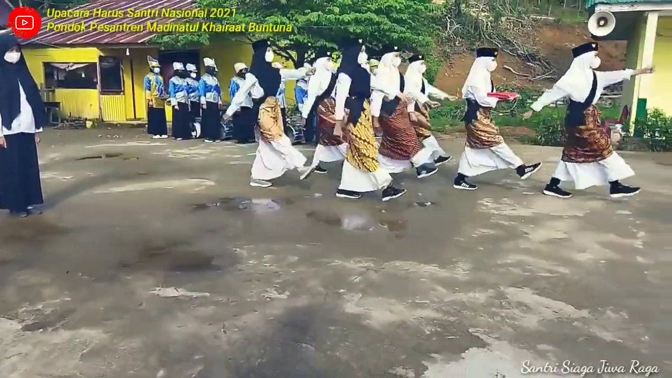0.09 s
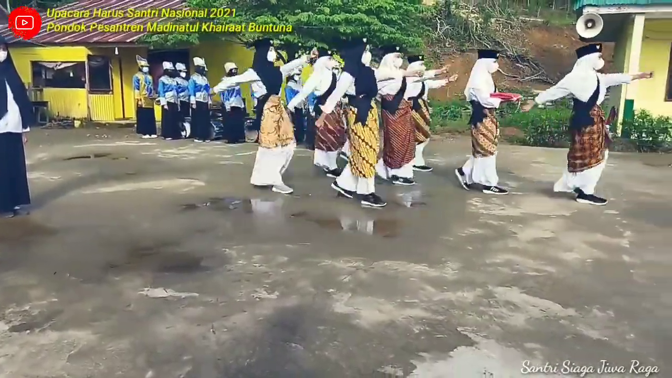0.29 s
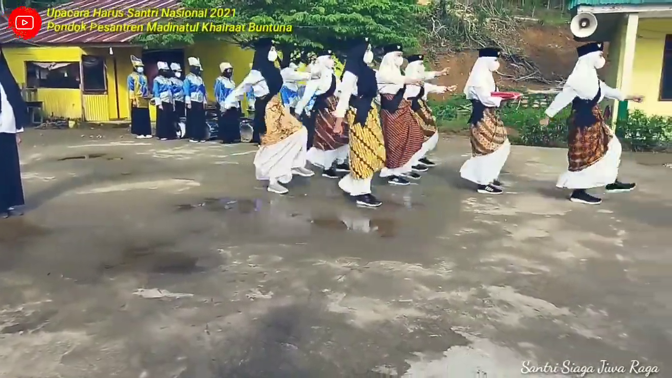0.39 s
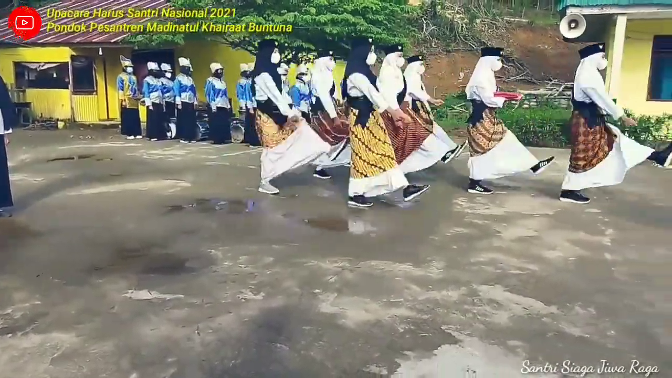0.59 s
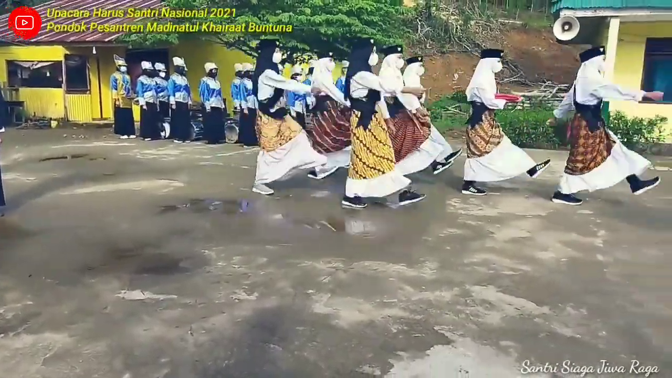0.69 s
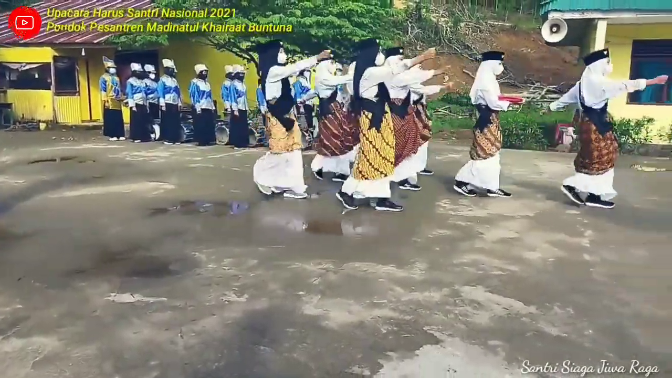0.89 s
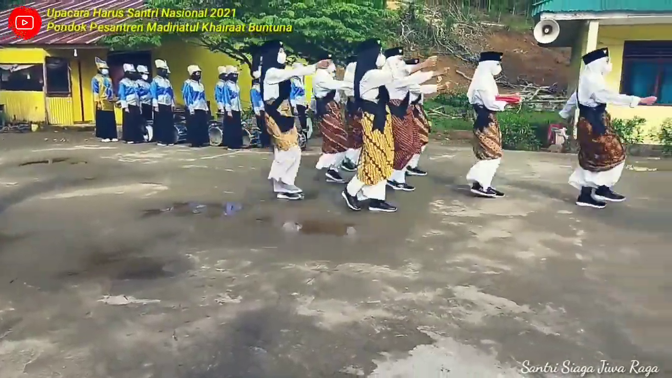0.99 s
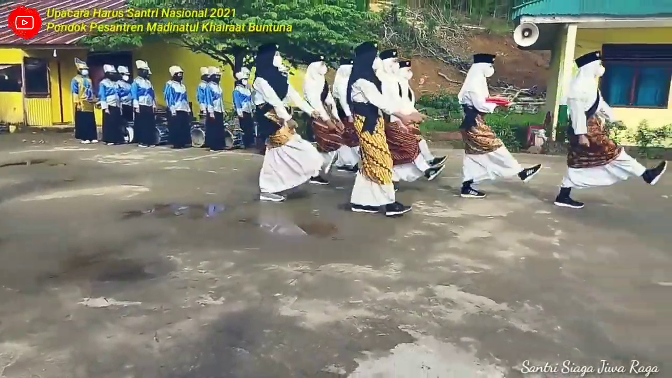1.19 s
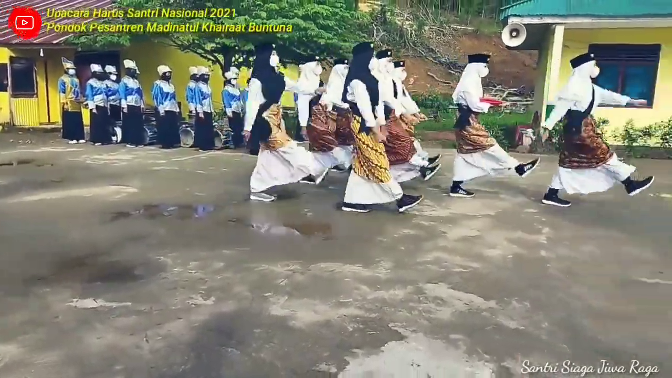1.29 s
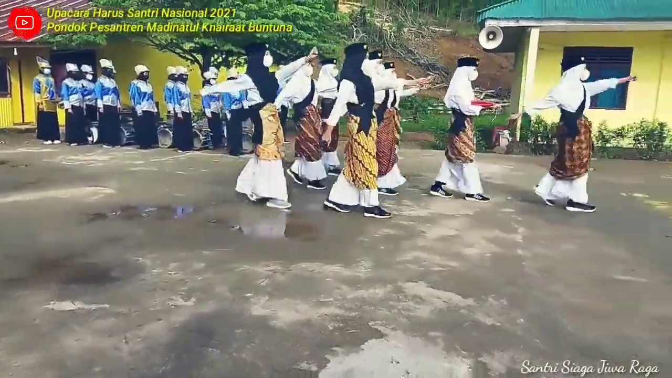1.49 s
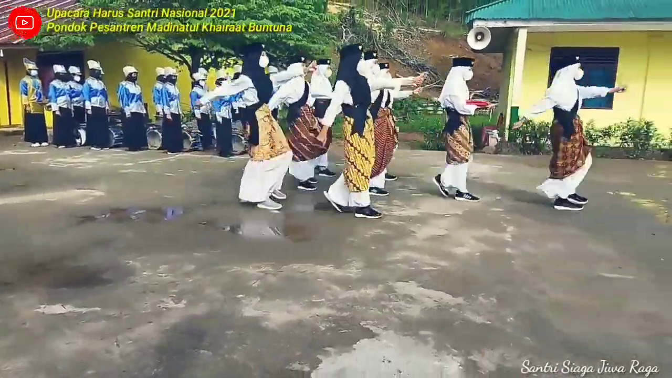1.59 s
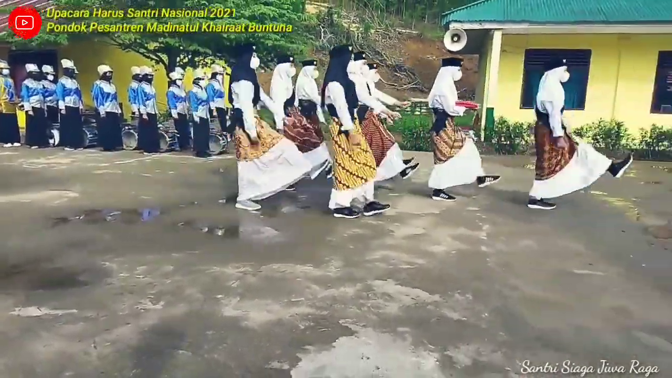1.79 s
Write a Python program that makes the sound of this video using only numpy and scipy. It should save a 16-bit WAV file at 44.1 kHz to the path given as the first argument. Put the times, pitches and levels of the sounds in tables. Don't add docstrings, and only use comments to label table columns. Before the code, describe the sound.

A group of marchers stamps three times on concrete, soles slapping in loose unison with gritty crunch and dull heel thumps; faint toe scuffs between, distant birds and light wind, heard from a few steps away.

```python
import sys
import numpy as np
from scipy import signal
from scipy.fft import rfft, irfft
from scipy.io import wavfile

SR = 44100
rng = np.random.default_rng(int(sys.argv[2]) if len(sys.argv) > 2 else 0)


def wrap_up_sound(samples):
    columns = np.atleast_2d(samples).T
    tamed = np.clip(columns, -1, 1)
    steps = np.round(tamed * 32767).astype(np.int16)
    wavfile.write(sys.argv[1], SR, steps)


def makeup_ratio(level_db):
    decades = np.asarray(level_db, float) / 20
    return 10 ** decades


N = 81585

# f/Hz, level/dB per Hz
WIND_SPECTRUM = [(20, -5.5), (45, -15.5), (115, -11.5), (200, -23.5), (400, -28.5), (800, -30.5),
                 (3000, -34.5), (5200, -40)]
# f/Hz, level/dB per Hz
HISS_SPECTRUM = [(4800, -37), (6300, -15), (7600, -1), (8600, 2.5), (10000, -2), (11200, -10),
                 (15500, -6.5)]
# t/s, slap level/dB, slap t60/s, grit level/dB, sole hollow f/Hz
STAMPS = [(.201, -45.5, 0.052, -43, 1500), (.2095, -26, 0.16, -31, 577), (.2205, -24.5, 0.061, -21, 1410),
          (.225, -26.5, 0.032, -38, 970), (.239, -31.5, 0.063, -38, 550), (.246, -30, .05, -30, 730),
          (.2645, -27, 0.064, -30.5, 2450), (.8215, -45.5, 0.071, -39, 865),
          (.828, -33.5, 0.029, -31, 2560), (.8335, -23, 0.083, -26.5, 1436),
          (.851, -27.5, 0.035, -27.5, 2620), (.860, -31.5, 0.14, -34, 2030), (.869, -35, 0.12, -30.5, 1090),
          (.885, -27.5, 0.052, -23, 2090), (.896, -32.5, 0.017, -31.5, 930), (1.452, -25, 0.057, -30, 697),
          (1.468, -21.5, 0.022, -22.5, 1030), (1.473, -23, .05, -42, 1400), (1.485, -22, 0.038, -46, 1020),
          (1.499, -39, 0.028, -28, 1210), (1.513, -38, 0.028, -29.5, 915), (1.532, -27.5, 0.072, -24, 2430),
          (1.539, -26.5, 0.043, -44, 930)]
# t/s, length/s, dull level/dB, grit level/dB
BLURS = [
    (0.207, .068, -31, -36.5),
    (0.851, 0.06, -32, -36),
    (1.449, 0.095, -32.5, -37),
]
# t/s, length/s, drag level/dB, dull level/dB
SCUFFS = [(.32, 0.084, -50, -58.5), (0.978, 0.022, -48.5, -49), (1.146, 0.032, -72, -54.5),
          (1.636, 0.049, -51, -75), (1.692, 0.0063, -48.5, -61), (1.761, 0.024, -39, -49.5),
          (1.778, 0.027, -44.5, -54.5), (1.804, 0.0096, -53, -60.5), (0.556, 0.011, -81, -57.5),
          (0.644, 0.009, -72, -68), (0.41, 0.061, -64, -61)]
# f/Hz, level/dB per Hz
SLAP_SPECTRUM = [(90, -26.5), (410, -8.5), (500, -0.5), (1050, -2.5), (2700, -3.5), (3600, -9.5),
                 (6000, -18), (12000, -32.5)]
# f/Hz, level/dB per Hz
GRIT_SPECTRUM = [(2000, 2), (3300, -17), (4700, -1), (6400, -11.5), (8500, 4), (10000, -2.5), (11800, -6.5),
                 (15300, 0.5)]
# f/Hz, level/dB per Hz
DRAG_SPECTRUM = [(1500, -22), (2600, -2), (3500, -11), (4800, -4), (6400, -14), (8800, 3), (11500, -7.5),
                 (15300, -7.5)]
# f/Hz, t60/s
YARD_T60 = [(150, 1), (700, 0.75), (2500, 0.58), (5000, 0.49), (12000, 0.41)]
# t/s, level/dB, f/Hz, t60/s
THUMPS = [(0.242, -32.5, 139.8, 0.15), (0.259, -23, 128, 0.033), (0.246, -39.5, 272, 0.13),
          (.449, -32.5, 132, 0.092), (0.449, -38.5, 294, 0.079), (.452, -45.5, 199, .12),
          (0.837, -42.5, 167.3, 0.11), (0.828, -38, 415, 0.068), (0.889, -42, 71, 0.126),
          (1.154, -48, 347, 0.057), (1.154, -51, 200, 0.056), (1.457, -35, 148.6, 0.067),
          (1.541, -61, 250, .08)]
# t/s, length/s, start f/Hz, end f/Hz
CHIRPS = [
    (.28, .03, 7550, 7400),
    (.305, .055, 7200, 5950),
    (.355, .075, 6000, 4500),
    (.668, .035, 4750, 4600),
    (.885, .055, 4850, 4750),
    (.62, .12, 810, 800),
    (1.29, .05, 620, 610),
]
CHIRP_LEVELS = [-51, -55, -61, -63.5, -54.5, -65, -59]
# t/s, length/s, start f/Hz, end f/Hz
CHURRS = [
    (.985, .06, 5150, 4700),
    (1.015, .065, 4500, 4000),
    (1.06, .06, 4700, 3900),
    (1.065, .055, 3700, 3200),
    (.712, .035, 4300, 3900),
]
CHURR_LEVELS = [-48.5, -47.5, -63, -53.5, -59.5]

WIND_DB, HISS_DB = -49.5, -59
HUM_HZ, HUM_WIDTH_HZ, HUM_DB = 63.1, 5, -62
SLAP_RISE_S, GRIT_RISE_S, GRIT_T60_S = 0.00097, 0.00067, 0.079
GRAINS_PER_S, GRAIN_SPREAD_DB = 12000, 3.5
SOLE_CYCLES, SOLE_DB, CRACK_DB = 15, -1.5, -2
BLUR_FADE_DB, DRAG_FADE_DB, NOTE_FADE_DB = -6.5, -1.5, -3.5
YARD_DB, YARD_GRIT_DB, YARD_BIRDS_DB, FIRST_WALL_S = -11.5, -13.5, -9.5, 0.006
CHIRP_WIDTH_HZ, CHURR_WIDTH_HZ = 35, 380
MIC_TOP_HZ = 15480


def rms_one(x):
    return x / np.sqrt(np.mean(x ** 2) + 1e-20)


def at_hz(points, hz):
    table = np.array(points)
    return np.interp(np.log(hz), np.log(table[:, 0]), table[:, 1])


def colour(x, spectrum):
    size = 8192
    hz = np.maximum(np.fft.rfftfreq(size, 1 / SR), 1)
    cepstrum = irfft(np.log(makeup_ratio(at_hz(spectrum, hz))))
    cepstrum[1:size // 2] *= 2
    cepstrum[size // 2 + 1:] = 0
    pulse = irfft(np.exp(rfft(cepstrum)))
    return signal.fftconvolve(x, pulse / np.sqrt(np.sum(pulse ** 2)))[:N]


def resonate(x, hz, width_hz):
    r = np.exp(-np.pi * width_hz / SR)
    top = np.array([1, 0, -1]) * (1 - r * r) / 2
    return signal.lfilter(top, [1, -2 * r * np.cos(2 * np.pi * hz / SR), r * r], x)


def time_since(s):
    return np.maximum(np.arange(N) / SR - s, 0)


def share_of(s, length):
    return np.clip((np.arange(N) / SR - s) / length, 0, 1)


def strike(s, db, rise_s, t60):
    t = time_since(s)
    return makeup_ratio(db) * (1 - np.exp(-t / rise_s)) * np.exp(-np.log(1000) * t / max(t60, 0.004))


def swell(s, length, db, fade_db=0):
    share = share_of(s, length)
    return makeup_ratio(db + fade_db * share) * np.sqrt(np.sin(np.pi * share).clip(0))


def power_sum(envelopes):
    return np.sqrt(np.sum(np.square(envelopes), axis=0))


def drift(rate):
    r = np.exp(-80 * np.pi * rate / SR)
    slow = signal.lfilter([1], [1, -2 * r, r * r], rng.standard_normal(N // 40 + 2002))
    slow = slow[2000:]
    return np.interp(np.arange(N) / 40, np.arange(len(slow)), rms_one(slow))


def air():
    white = rng.standard_normal((3, N))
    wind = colour(white[0], WIND_SPECTRUM + [(SR / 2, -70)]) * makeup_ratio(0.88 * drift(6))
    hiss = colour(white[1], HISS_SPECTRUM) * makeup_ratio(0.6 * drift(6))
    hum = rms_one(resonate(white[2], HUM_HZ, HUM_WIDTH_HZ))
    return makeup_ratio(WIND_DB) * wind + makeup_ratio(HISS_DB) * hiss + makeup_ratio(HUM_DB) * hum


def grains():
    sizes = makeup_ratio(GRAIN_SPREAD_DB * np.minimum(rng.exponential(1, N), 4)) * rng.choice([-1, 1], N)
    clicks = sizes * (rng.random(N) < GRAINS_PER_S / SR)
    return rms_one(clicks + 0.37 * rng.standard_normal(N))


def sole_slaps(slaps):
    blurs = [swell(s, d, db, BLUR_FADE_DB) for s, d, db, _ in BLURS]
    dull_scuffs = [swell(s, d, db) for s, d, _, db in SCUFFS]
    push = power_sum(slaps + dull_scuffs + blurs) * grains()
    for s, db, *_ in STAMPS:
        start = int(s * SR) + 30
        push[start:start + 12] -= makeup_ratio(db + CRACK_DB) * np.hanning(12)
    return colour(push, SLAP_SPECTRUM)


def sole_hollows(slaps):
    sand, out = grains(), 0
    for envelope, (*_, hz) in zip(slaps, STAMPS):
        width_hz = hz / SOLE_CYCLES * 2
        ring = resonate(envelope * sand + 1e-18, hz, width_hz)
        out = out + makeup_ratio(SOLE_DB) * ring * np.sqrt(SR / np.pi / width_hz)
    return out


def grit_and_scuffs():
    crushed = [strike(s, db, GRIT_RISE_S, GRIT_T60_S) for s, _, _, db, _ in STAMPS]
    blurs = [swell(s, d, db) for s, d, _, db in BLURS]
    drags = [swell(s, d, db, DRAG_FADE_DB) ** 2 / makeup_ratio(db) for s, d, db, _ in SCUFFS]
    grit = colour(power_sum(crushed + blurs) * grains(), GRIT_SPECTRUM)
    return grit + colour(power_sum(drags) * grains(), DRAG_SPECTRUM)


def bands(x, low_hz, count):
    edges = np.minimum(low_hz * 2 ** (np.arange(count + 1) / 3), 19000)
    out = []
    for a, b in zip(edges, edges[1:]):
        sos = signal.butter(2, [a, b], "band", fs=SR, output="sos")
        out.append((np.sqrt(a * b), signal.sosfilt(sos, x)))
    return out


def yard(x):
    t = np.arange(SR) / SR
    draws = [bands(white, 68.3, count=24) for white in rng.standard_normal((2, SR))]
    tail = np.zeros(SR)
    for k, (hz, _) in enumerate(draws[0]):
        tail += draws[k % 2][k][1] * np.exp(-np.log(1000) * t / at_hz(YARD_T60, hz))
    tail *= 1 - np.exp(-(t / FIRST_WALL_S) ** 2)
    return signal.fftconvolve(x, tail / np.sqrt(np.sum(tail ** 2)))[:N]


def thumps():
    out = np.zeros(N)
    for s, db, hz, t60 in THUMPS:
        t = time_since(s)
        ring = np.sin(2 * np.pi * hz * t * (1 + 0.11 * np.exp(-t / 0.014)))
        out += strike(s, db + 9.5, 0.0068, t60) * ring
    return out


def note(s, length, from_hz, to_hz, db, width_hz):
    hz = from_hz + (to_hz - from_hz) * share_of(s, length)
    phase = 2 * np.pi * np.cumsum(hz) / SR
    lowpass = signal.butter(2, width_hz, fs=SR, output="sos")
    blur = rms_one(signal.sosfilt(lowpass, rng.standard_normal((2, N))))
    return swell(s, length, db, NOTE_FADE_DB) * (blur[0] * np.sin(phase) + blur[1] * np.cos(phase))


def birds():
    chirps = sum(note(*c, db, CHIRP_WIDTH_HZ) for c, db in zip(CHIRPS, CHIRP_LEVELS))
    churrs = sum(note(*c, db, CHURR_WIDTH_HZ) for c, db in zip(CHURRS, CHURR_LEVELS))
    return chirps + churrs


def scene():
    slaps = [strike(s, db, SLAP_RISE_S, t60) for s, db, t60, _, _ in STAMPS]
    body = sole_slaps(slaps)
    hollow = sole_hollows(slaps)
    grit = grit_and_scuffs()
    song = birds()
    walls = yard(makeup_ratio(YARD_DB) * body + makeup_ratio(YARD_GRIT_DB) * grit + makeup_ratio(YARD_BIRDS_DB) * song)
    return (air() + body + hollow + grit + walls + thumps() + song)[None]


def roll_off(x):
    return signal.sosfilt(signal.butter(12, 16800, fs=SR, output="sos"), x)


def record(dry):
    top_cut = signal.ellip(10, 0.5, 60, MIC_TOP_HZ, fs=SR, output="sos")
    mix = signal.sosfilt(top_cut, dry)
    return roll_off(mix)


dry = scene()
out = record(dry)
wrap_up_sound(out)
```